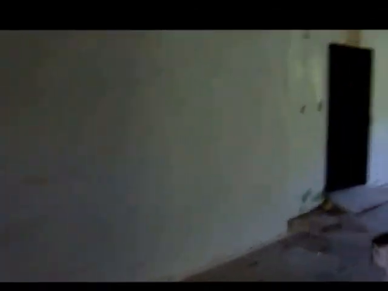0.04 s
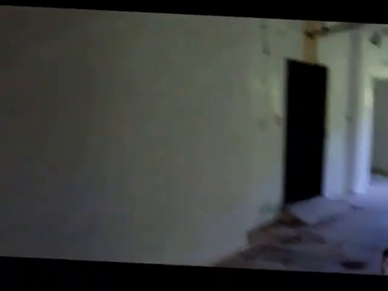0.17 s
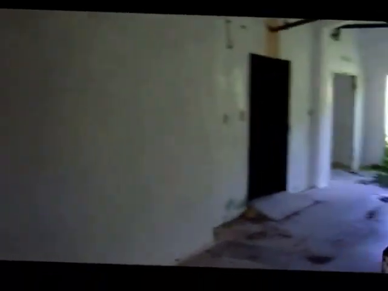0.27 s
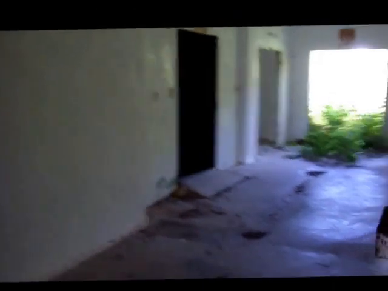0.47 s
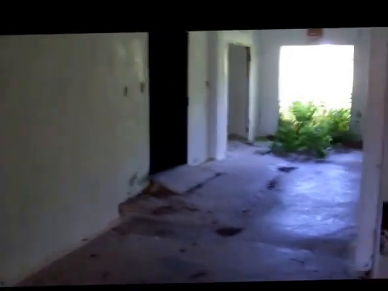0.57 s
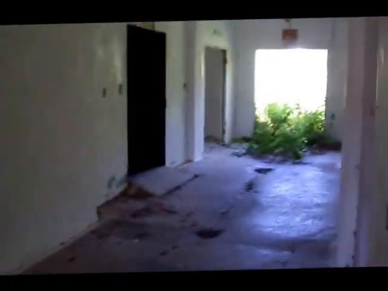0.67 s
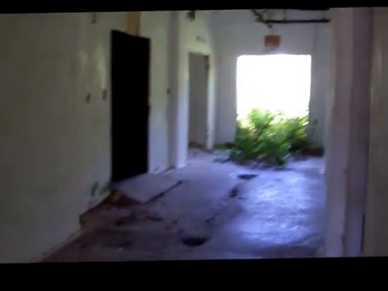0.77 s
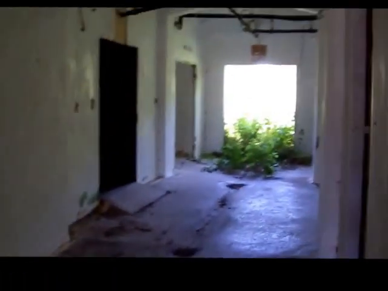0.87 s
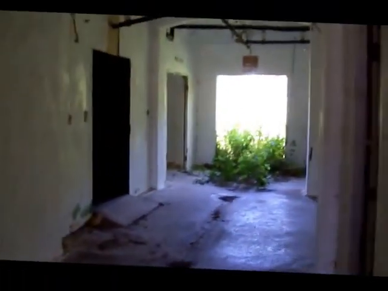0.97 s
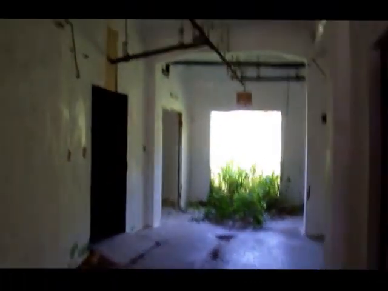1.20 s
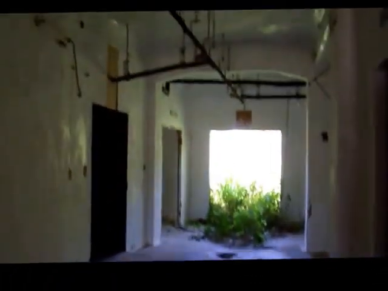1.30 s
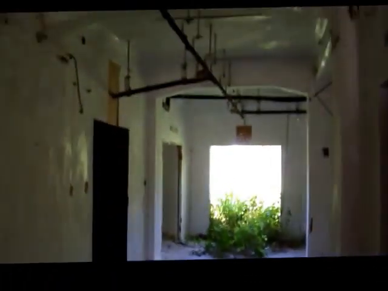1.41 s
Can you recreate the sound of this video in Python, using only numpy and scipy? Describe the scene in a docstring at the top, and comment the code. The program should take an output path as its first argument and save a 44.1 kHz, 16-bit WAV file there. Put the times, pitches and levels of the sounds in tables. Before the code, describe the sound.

One hard footstep knocks and echoes in a bare concrete corridor. Faint scuffs and ticks of grit follow over a hollow room tone, with soft handling rumble and hiss from a small hand-held camera.

```python
"""One hard footstep in a bare concrete corridor, heard by a small hand-held camera. The sole scrapes in, the
heel knocks, near walls slap it back and the building rings on. Grit ticks and faint scuffs follow over the
hollow, fading wash of earlier steps, all coloured by the microphone in its case. Handling rumble, soft bumps of
the hand and microphone hiss sit underneath."""
import sys
import numpy as np
from scipy import signal
from scipy.fft import rfft, irfft
from scipy.io import wavfile
from scipy.ndimage import uniform_filter1d, minimum_filter1d

SR = 44100
rng = np.random.default_rng(int(sys.argv[2]) if len(sys.argv) > 2 else 0)


def inscribe(sig):
    """Save sig as 16-bit PCM at rate SR to the path in sys.argv[1].

    A 1-D sig is mono; a 2-D sig holds one channel per row.
    Samples are clipped to [-1, 1] before scaling.
    """
    pcm = np.round(np.clip(np.atleast_2d(sig).T, -1, 1) * 32767)
    wavfile.write(sys.argv[1], SR, pcm.astype(np.int16))


N = 63945


def footstep(hall):
    """Heel and sole knock in quick succession; the heel sets off thin wall slaps and the reverb."""
    # The shoe's knock, strong and hollow below 1 kHz. Each row: frequency in Hz, gain in dB.
    knock_eq = [(150, -6), (350, 3.5), (550, 13.5), (760, 14.5), (950, 15.5), (1200, 6), (1500, -1.5),
                (3000, -2.5), (4700, 0), (8000, -1.5), (11000, -2), (15000, -9)]
    # Slapback off near walls. Each row: delay in seconds, level in dB relative to the heel.
    wall_slaps = [(.004, 4), (.0066, -5), (.008, -8), (.012, 4), (.0172, -6), (.0237, -8), (.033, -7)]
    # The thinner tone of the slaps. Each row: frequency in Hz, gain in dB.
    slap_eq = [(300, -9), (600, 1.5), (1000, 4.5), (1500, 1), (3000, 0), (4700, 2), (8000, -4.5),
               (11000, -1), (15000, 5)]
    step_s, sole_lag_s, impact_db = 0.265, 0.00132, 19.5
    heel = -undb(impact_db) * click(step_s)
    sole = -undb(impact_db) * click(step_s + sole_lag_s)
    slaps = colour(sum(undb(db) * click(delay) for delay, db in wall_slaps), slap_eq)
    return colour(heel + sole, knock_eq) + convolve(heel, slaps + hall)


def scuffs(hall):
    """The sole scrapes in grainy swells and grit cracks underfoot, with a little corridor reverb."""
    # Sole scrapes. Each row: start, rise and fade time in seconds, level in dB, centre in Hz.
    scrapes = [(0.22, 0.0045, 0.046, -8, 648), (0.243, 0.0065, 0.048, -6.5, 3940),
               (.518, .006, 0.044, -11, 15000), (.625, 0.014, .025, -17.5, 646),
               (.65, 0.012, 0.035, -25, 3000), (.77, 0.032, 0.032, -29, 3500),
               (.893, .008, 0.041, -15.5, 12100), (1.002, 0.011, 0.062, -15.5, 3340),
               (1.375, 0.029, 0.091, -21.5, 2340)]
    # Single cracks of grit. Each row: start in seconds, level in dB, centre in Hz.
    grit = [(0.2232, 10.5, 1700), (.2335, 2, 3500), (.8975, 13.5, 11000), (1.0035, 5, 3040),
            (1.0125, 3, 3640)]
    grain_samples, grain_spread_db, reverb_send_db = 32, 2, -12
    t, floor = times(), 0
    for start, rise, fade, db, hz in scrapes:
        noise = rng.standard_normal(N)
        roughness = np.repeat(rng.standard_normal(N // grain_samples + 1), grain_samples)[:N]
        grains = noise * undb(grain_spread_db * roughness)
        swell = np.clip((t - start) / rise, 0, 1) * np.exp(-np.maximum(t - start - rise, 0) / fade)
        floor += undb(db) * hump(grains / grains.std() * swell, hz)
    floor += sum(undb(db) * hump(click(start), hz) for start, db, hz in grit)
    return floor + undb(reverb_send_db) * convolve(floor, hall)


def corridor():
    """The corridor's impulse response: quick early echoes and a long tail that dulls as it fades."""
    # Bands of the reverb tail. Each row: frequency in Hz, level in dB, seconds to fall by 60 dB.
    tail_bands = [(150, -51, 1.1), (400, -25.5, 0.43), (660, -23, 1.81), (996, -28.5, 1.36),
                  (1550, -27.5, 1.65), (2680, -28, 1.09), (4700, -32.5, 1.04), (7300, -30.5, 0.61),
                  (12900, -20.5, 0.17)]
    early_db, early_hz, build_s = -13.5, 1400, 0.012
    hz = np.fft.rfftfreq(N, 1 / SR)
    spectrum, tail = rfft(rng.standard_normal(N)), 0
    for band, (_, db, t60) in enumerate(tail_bands):
        # each band crossfades into its neighbours
        share = over_hz(hz, [(row[0], j == band) for j, row in enumerate(tail_bands)])
        tail += undb(db) * irfft(spectrum * share, N) * decay(t60)
    early = undb(early_db) * hump(rng.standard_normal(N), early_hz) * decay(t60=0.14)
    return (tail + early) * (1 - np.exp(-times() / build_s))


def earlier_steps_wash():
    """The diffuse, hollow wash of earlier steps and scuffs dying away down the corridor, slowly sinking."""
    # Tone of the wash. Each row: frequency in Hz, gain in dB.
    wash_eq = [(200, -2), (600, 4.5), (1500, -1.5), (2800, 3.5), (4700, -3.5), (9000, -7.5)]
    # Its fader ride. Each row: time in seconds, gain in dB.
    wash_ride = [(0, -24.5), (.2, -24), (.6, -25), (.95, -26.5), (1.12, -30), (1.28, -31.5), (1.45, -32.5)]
    return ride(colour(rng.standard_normal(N), wash_eq), wash_ride)


def microphone(sound):
    """The case colours the microphone and holds the treble back, so clicks ring for a few cycles."""
    # Response of the microphone in its case. Each row: frequency in Hz, gain in dB.
    mic_eq = [(60, -11.5), (320, -10.5), (520, -6), (740, -9.5), (920, -13.5), (1100, -16), (1230, -8.5),
              (1380, 0.5), (1600, -2.5), (1850, -8), (2200, -11.5), (2700, -15.5), (3600, -12.5),
              (4350, -5.5), (5000, -5), (5600, -12), (6300, -23.5), (7200, -17), (9000, -25),
              (11500, -31.5), (15000, -51)]
    case_hz, case_width_hz = 4700, 3200
    radius = np.exp(-np.pi * case_width_hz / SR)
    feedback = np.array([1, -2 * radius * np.cos(2 * np.pi * case_hz / SR), radius ** 2])
    return signal.lfilter(feedback[::-1], feedback, colour(sound, mic_eq))  # all-pass resonance


def handling():
    """The carried camera rumbles and the hand bumps softly on its case."""
    # Bumps of the hand. Each row: start in seconds, level in dB, pitch in Hz.
    hand_bumps = [(0.218, -28.5, 227), (.458, -32, 129), (0.633, -31, 205), (0.864, -27, 150),
                  (0.888, -32.5, 400), (1.012, -26, 111), (1.195, -35.5, 150), (1.311, -25.5, 170)]
    # Tone of the rumble. Each row: frequency in Hz, gain in dB.
    rumble_eq = [(8, -21), (27, -7), (42, -18), (62, -20), (95, -21.5), (160, -30.5), (300, -34.5),
                 (700, -72), (2000, -64.5)]
    # Its fader ride. Each row: time in seconds, gain in dB.
    rumble_ride = [(0, 2), (.27, 1), (.42, -2.5), (.66, -4), (.8, 2), (1.1, -4), (1.22, 1), (1.45, 2.5)]
    bumps = sum(undb(db) * convolve(click(start), -ring(hz, t60=0.029)) for start, db, hz in hand_bumps)
    rumble = colour(rng.standard_normal(N), rumble_eq)
    return ride(rumble, rumble_ride) + bumps


def hiss():
    """Self-noise of the microphone, with a thin whistle in it."""
    # Tone of the hiss. Each row: frequency in Hz, gain in dB.
    hiss_eq = [(1000, -50), (6000, -50.5), (10000, -54), (14500, -54), (16000, -81)]
    whistle_hz, whistle_db = 7950, -58.5
    whistle = convolve(rng.standard_normal(N), ring(whistle_hz, t60=0.009))
    return colour(rng.standard_normal(N), hiss_eq) + undb(whistle_db) * whistle / whistle.std()


def undb(db):
    """Decibels to gain."""
    return 10 ** (np.asarray(db) / 20)


def times():
    """Time of each sample in seconds."""
    return np.arange(N) / SR


def click(start):
    """Unit impulse at a time in seconds."""
    return 1. * (np.arange(N) == round(start * SR))


def decay(t60):
    """Envelope that falls by 60 dB every t60 seconds."""
    return undb(-60 * times() / t60)


def ring(hz, t60):
    """One damped mode."""
    return np.sin(2 * np.pi * hz * times()) * decay(t60)


def ride(sound, points):
    """Move the fader through (seconds, dB) points."""
    return sound * undb(np.interp(times(), *np.array(points).T))


def over_hz(hz, points):
    """Read (Hz, value) points on a log-frequency axis."""
    point_hz, values = np.array(points, float).T
    return np.interp(np.log(np.maximum(hz, 1)), np.log(point_hz), values)


def convolve(sound, response):
    """Pass a sound through an impulse response."""
    return signal.fftconvolve(sound, response)[:N]


def colour(sound, points):
    """Minimum-phase EQ through (Hz, dB) points: nothing rings ahead of an attack."""
    size = 8192
    gain = undb(over_hz(np.fft.rfftfreq(size, 1 / SR), points))
    cepstrum = irfft(np.log(gain))
    cepstrum[1:size // 2] *= 2
    cepstrum[size // 2 + 1:] = 0
    return convolve(sound, irfft(np.exp(rfft(cepstrum))))


def hump(sound, hz):
    """Broad band-pass around one frequency."""
    half_width_octaves = 0.68
    bell = [(hz * 2. ** k, -10 * np.log10(1 + (k / half_width_octaves) ** 4)) for k in range(-4, 5)]
    return colour(sound, bell)


def scene():
    """Step, scuffs and the fading wash of earlier steps through the microphone, plus the camera's own noise, in
    mono."""
    hall = corridor()
    airborne = footstep(hall) + scuffs(hall) + earlier_steps_wash()
    return (microphone(airborne) + handling() + hiss())[None]


def record(dry):
    """A fast limiter catches the loudest peaks and a steep low-pass cuts the top."""
    ceiling, limiter_s, top_hz = 0.95, 0.0008, 15700
    window = int(limiter_s * SR)
    gain = minimum_filter1d(ceiling / np.maximum(np.abs(dry), ceiling), 2 * window)
    limited = dry * uniform_filter1d(gain, window)
    return signal.sosfilt(signal.ellip(10, .2, 80, top_hz, fs=SR, output="sos"), limited)


dry = scene()
out = record(dry)
inscribe(out)
```